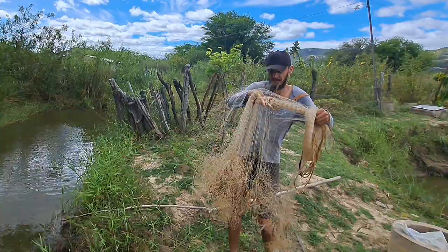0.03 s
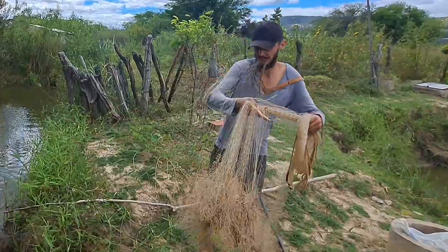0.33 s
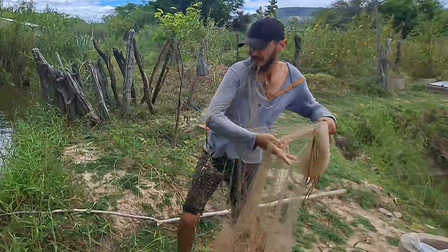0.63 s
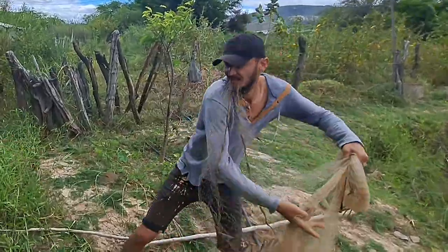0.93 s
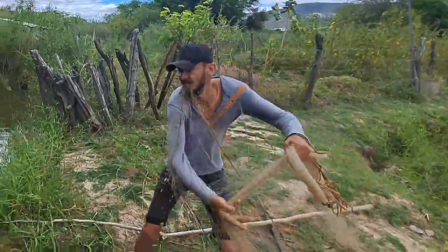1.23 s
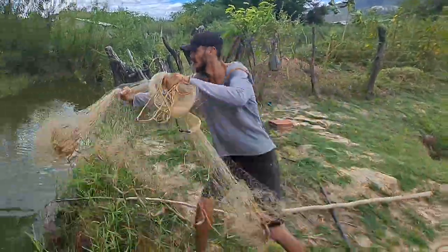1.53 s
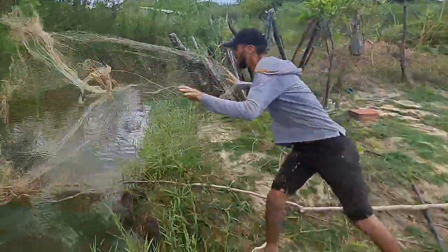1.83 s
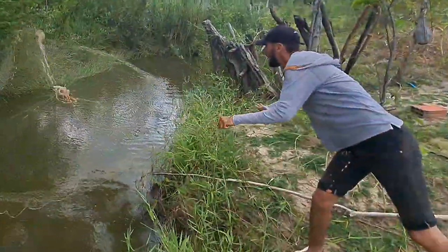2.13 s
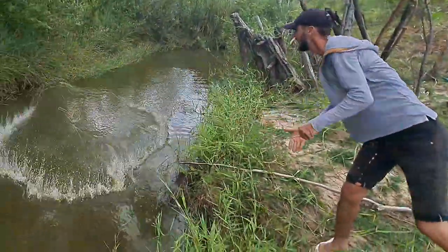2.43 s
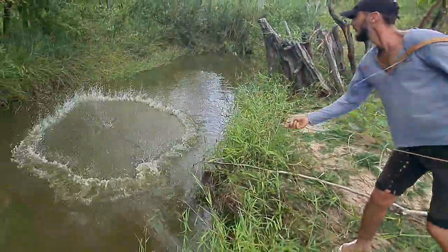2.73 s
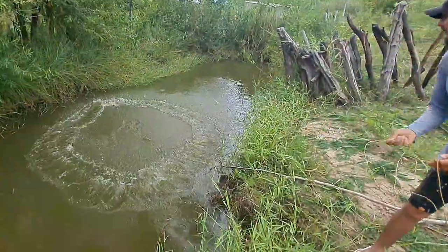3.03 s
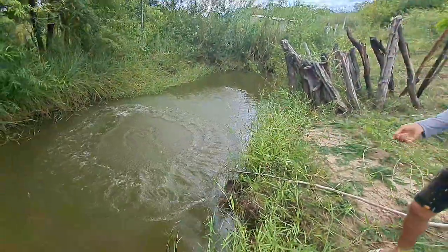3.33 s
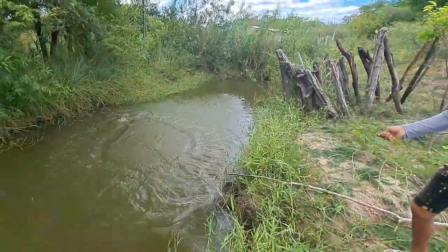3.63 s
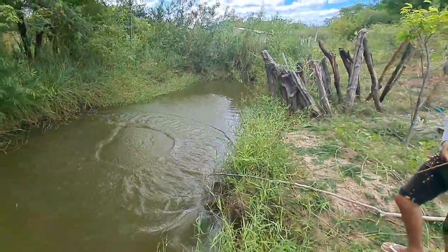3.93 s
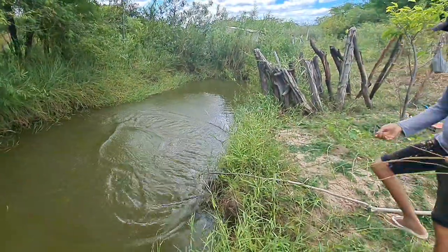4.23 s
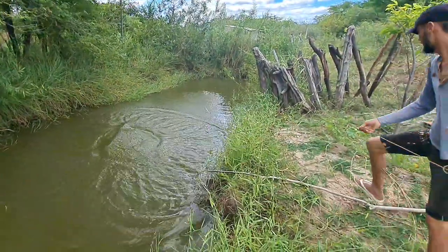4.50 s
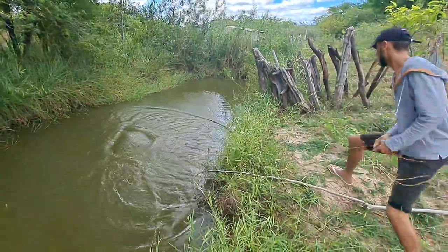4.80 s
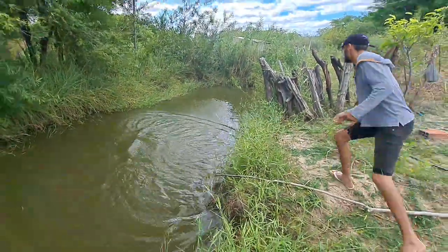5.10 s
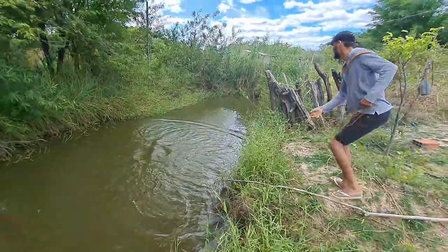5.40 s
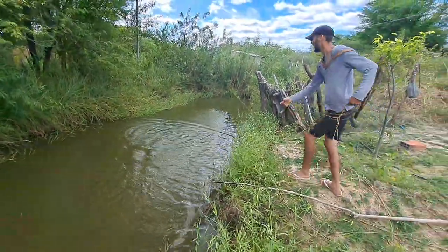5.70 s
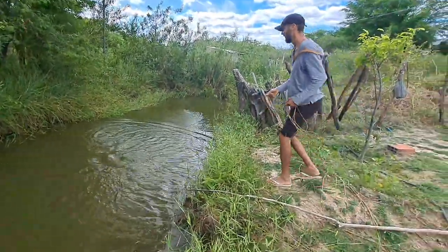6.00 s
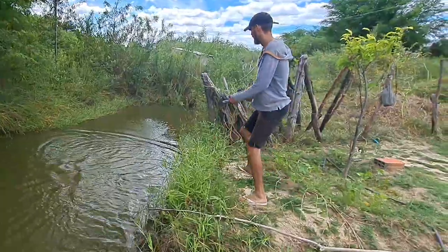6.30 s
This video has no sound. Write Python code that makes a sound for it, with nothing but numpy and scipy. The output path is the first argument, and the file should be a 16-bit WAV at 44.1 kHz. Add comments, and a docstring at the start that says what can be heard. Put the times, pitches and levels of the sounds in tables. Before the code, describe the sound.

Wind buffets the microphone on a pond bank, opening with strong low thumps on the left in the first quarter second, then rumbling in uneven gusts throughout. Leaves hiss softly, a faint far trill fades within the first second, and a distant engine hums low, slowing after 3 seconds. Until about 2 seconds, a cast net rustles faintly, its sinkers clink and a few stalks snap. At about 2.3 seconds the net hits the water: a quick cluster of sharp slaps merges into a loud, broad splash with deep gulping bubbles. Spray patters back around 2.8 to 3.2 seconds, and fizzing foam and drips die away by about 3.5. Small isolated plips follow until the end. From 4 to 6 seconds, quiet footsteps press into dry grass, with a stalk snapping near 5.1 and more wind thumps.

```python
"""A grassy bank by a pond, where a fisherman swings a cast net and throws it onto the water.
The mesh swishes, then the ring of lead sinkers cracks down in arcs; air pockets pinch off and gulp,
spray patters back, foam fizzes and a few last bubbles pop. Feet crunch in the dry grass.
Wind buffets the two microphone ports, leaves hiss, and far off a faint trill fades and an engine slows."""
import sys
import numpy as np
from scipy import signal
from scipy.fft import rfft, irfft, next_fast_len
from scipy.io import wavfile
from scipy.ndimage import uniform_filter1d

SR = 44100
rng = np.random.default_rng(int(sys.argv[2]) if len(sys.argv) > 2 else 0)


def dump(signal):
    """Clip the signal to [-1, 1] and save it as 16-bit WAV at the path in sys.argv[1]."""
    limited = np.clip(np.atleast_2d(signal).T, -1, 1)
    pcm = np.round(limited * 32767).astype(np.int16)
    wavfile.write(sys.argv[1], SR, pcm)


N = 280035
TIME = np.arange(N) / SR
FREQS = np.maximum(np.fft.rfftfreq(2 * N, 1 / SR), 1)

# arcs of the weighted rim land in turn: (time [s], crack level [dB], crack decay [s], churn level [dB])
LANDINGS = [(2.28, -40, 0.0065, -47), (2.342, -56, .006, -40), (2.364, -28, .008, -27),
            (2.371, -17.5, 0.0055, -27), (2.405, -28, 0.009, -34), (2.44, -28, 0.0074, -26),
            (2.513, -22, 0.012, -24), (2.566, -35, .006, -43), (2.643, -35, 0.014, -33)]
# thrown water rains back: (time [s], hold [s], level [dB])
SHOWERS = [(2.762, 0.16, -33.5), (3.002, 0.018, -38.5), (3.103, 0.035, -39), (3.192, 0.013, -68),
           (3.408, 0.035, -59.5)]
# bubbles that stand out: (time [s], level [dB], pitch [Hz], ring time to -60 dB [s])
BUBBLES = [(2.376, -17, 353, 0.045), (2.406, -16, 413, 0.045), (2.422, -12.5, 324, 0.046),
           (2.481, -13, 279, 0.055), (2.51, -15.5, 253, 0.09), (2.54, -18, 328, 0.074),
           (2.571, -20, 265, 0.064), (2.655, -19.5, 398, 0.069), (2.753, -20, 5170, 0.018),
           (2.769, -30.5, 487, 0.12), (2.807, -27, 467, 0.06), (3.375, -45, 1070, 0.021),
           (3.376, -42, 4400, 0.017), (3.421, -38, 1600, 0.018), (3.978, -49, 1638, 0.029),
           (3.983, -48, 2443, 0.017), (4.213, -32.5, 1880, 0.04), (4.446, -45, 2900, 0.021),
           (4.453, -44.5, 1150, 0.079), (4.458, -43.5, 3050, .025), (4.565, -49, 2320, 0.02),
           (4.992, -42, 664, 0.038), (5.298, -47, 2110, .025), (5.858, -49, 3160, .025),
           (6.105, -49.5, 950, 0.055)]
# soft swells: (time [s], level [dB], half length [s])
FIZZ = [(2.287, -48, 0.006), (2.48, -44, 0.14), (2.85, -48.5, 0.17), (3.15, -55.5, 0.32)]  # mist off the mesh, then foam
RUSTLES = [(0.176, -59.5, 0.039), (1.096, -62.5, 0.023), (1.57, -54.5, 0.018), (1.62, -60.5, 0.026),
           (1.95, -61, 0.25), (2.196, -81, 0.1), (3.78, -62, 0.033), (4.105, -59, 0.022),
           (4.289, -56, 0.018), (5.68, -61.5, 0.081)]  # mesh and grass brush past
STEPS = [(4.03, -60, 0.011), (4.755, -59.5, 0.013), (4.80, -56, 0.014), (4.835, -51.5, 0.013),
         (4.875, -60, 0.0039), (5.14, -62, 0.021), (5.3, -61, 0.0093), (5.81, -57, 0.0065)]  # feet press into dry grass
# sharp hits: (time [s], level [dB])
STALK_SNAPS = [(1.099, -55), (1.122, -52), (1.174, -41), (4.028, -46), (5.104, -35.5)]
SINKER_CLINKS = [(0.147, -42), (0.720, -56), (1.864, -43.5), (1.948, -50), (2.042, -45.5), (4.76, -62),
                 (4.835, -60), (5.104, -50)]

# the breeze that never stops: (time [s], left level [dB], right level [dB])
BREEZE = [(0.07, -67, -39), (1.0, -49, -51), (1.65, -68, -42), (2.6, -38, -41.5), (3.6, -47.5, -66),
          (4.05, -51, -56), (4.35, -63, -56), (5.0, -47.5, -72), (6.35, -49, -57)]
# gusts on the ports: (time [s], hold [s], left level [dB], right level [dB])
GUSTS = [(0.075, 0.14, -25, -46), (0.306, 0.068, -52, -38), (0.403, 0.05, -36.5, -39),
         (0.58, 0.22, -40.5, -39.5), (0.829, 0.056, -39, -41.5), (1.218, 0.3, -43.5, -49),
         (1.69, 0.12, -66, -54), (1.833, 0.36, -39.5, -38), (2.111, 0.12, -60, -35),
         (2.166, 0.08, -34.5, -39.5), (2.332, 0.14, -31.5, -31.5), (2.859, 0.32, -37.5, -41.5),
         (3.206, 0.09, -48, -64), (3.395, 0.12, -40, -48), (3.823, 0.32, -55.5, -54.5),
         (4.485, 0.17, -46.5, -48.5), (4.716, 0.089, -39.5, -38.5), (5.029, 0.024, -39, -66),
         (5.107, 0.14, -35.5, -65), (5.256, 0.13, -35, -37.5), (5.429, 0.176, -39.5, -38.5),
         (5.664, 0.083, -54, -70), (5.777, 0.028, -42, -42), (6.026, 0.11, -43, -46)]
# lone eddies: (time [s], left level [dB], right level [dB], pitch [Hz], half length [s])
EDDIES = [(0.079, -21, -38, 70, 0.0088), (0.115, -14, -50, 325, 0.0041), (0.153, -14.5, -50, 500, 0.001),
          (0.158, -6.5, -44, 195, 0.0034), (0.193, -19.5, -50, 375, 0.0043), (0.215, -10, -48, 290, 0.002),
          (0.85, -31, -31, 138, 0.003), (1.422, -24.5, -23, 71, 0.004), (2.038, -21.5, -27.5, 171, 0.0052),
          (2.05, -19, -14, 55.5, 0.013), (4.792, -29, -31.5, 74.4, 0.0098), (5.329, -34, -25, 136.5, 0.013),
          (5.359, -25.5, -29, 224, 0.0022), (5.533, -25, -43, 110, 0.0061), (5.607, -36, -30, 167, 0.0024),
          (5.789, -25.5, -35, 60, 0.0051), (6.076, -32, -40, 90, 0.006)]
# far engine: (time [s], firing rate [Hz], level [dB], second harmonic against first [dB])
ENGINE = [(0.07, 55.5, -44, -32), (0.8, 55.14, -59.5, -6), (1.3, 55.74, -39.5, -17.5),
          (1.65, 55.46, -57, -5), (2.5, 55.98, -56, -10), (3.0, 55.9, -45, -9.5), (3.5, 52.33, -64.5, -1),
          (4.0, 47.54, -52.5, -9.5), (4.55, 45.1, -62, 7.5), (5.0, 42.9, -83, 10), (6.35, 42.6, -73, -6)]
# fader rides for the leaves and the far trill: (time [s], level [dB])
LEAF_LEVEL = [(0.07, -62), (0.9, -64.5), (1.4, -62), (1.8, -59), (3.6, -60.5), (4.6, -60.5), (5.5, -60),
              (6.35, -62.5)]
TRILL_LEVEL = [(0.07, -58.5), (0.3, -61.5), (0.65, -63.5), (0.95, -72), (1.4, -72)]

# tone colour of each layer: (frequency [Hz], relative level [dB])
SPRAY_EQ = [(300, -26), (600, -5.5), (800, -4.5), (1100, -1), (1650, 4), (2050, -4.5), (2550, -2.5),
            (3350, -8), (4100, -9.5), (5400, -10), (6500, -24.5), (8700, -35), (12000, -17.5), (15800, -36)]
POCKET_EQ = [(100, -22), (180, -10.5), (250, -6), (380, 0.5), (520, -4.5), (700, -4.5), (1100, -34)]
DRIP_EQ = [(450, -9.5), (800, -6.5), (1100, 2.5), (1650, -1.5), (2050, -6), (2550, -3), (3500, -12.5),
           (5400, -14), (6500, -20)]
FIZZ_EQ = [(1900, -11), (2600, -3.5), (3300, -7), (4300, -7.5), (5400, -1.5), (6400, -10.5), (8700, -17),
           (12000, -8.5), (15800, -18)]
RUSTLE_EQ = [(300, -16), (1000, -16), (2300, 3), (3500, 0), (5200, 4), (6800, -5.5), (8700, -13),
             (12000, -0.5), (15800, -20.5)]
STEP_EQ = [(400, -3), (1000, 1.5), (2100, 4), (3500, -6), (5200, -0.5), (8500, -19), (12000, -9),
           (15800, -29)]
SNAP_EQ = [(200, -1), (500, 16), (1400, 10.5), (2800, -1), (5200, -2), (8500, -12), (12000, -34),
           (15800, -20)]
CLINK_EQ = [(2500, -8), (5500, -1), (8500, -12), (12000, -0.5), (15800, -9)]
WIND_EQ = [(25, -6.5), (55, 2.5), (110, -3), (200, -11), (400, -19), (800, -35), (1600, -54)]
LEAF_EQ = [(410, -9), (700, -1), (934, 1.5), (1380, -4.5), (2000, -8.5), (2960, -4), (3240, -5.5),
           (4670, -4.5), (5330, -1), (8310, -17), (10700, -9), (12500, -7), (16000, -18)]
TRILL_EQ = [(1300, -29), (1850, -6), (2200, -3.5), (2550, -8), (2950, -26)]
AIR_EQ = [(30, 0.5), (100, -1), (220, -5.5), (380, -0.5), (600, -9.5), (900, -18.5), (1500, -14)]

# pond sound at the ports: (frequency [Hz], left phase lead [rad])
PORT_PHASE = [(100, 0), (450, -0.56), (720, 2.2), (1000, 0.18), (1550, 1.58), (1950, 3), (2760, 8),
              (3400, 8.5), (3900, 10.5), (4500, 15.5), (5400, 22.5), (7000, 30), (16000, 59)]
# shading by the housing: (frequency [Hz], left level over right [dB])
PORT_BALANCE = [(300, 0), (580, -4), (850, 5.5), (1600, 0.7), (2050, 5.5), (2500, -1.5), (4200, -2),
                (6000, 1), (12000, 2)]
# focus of the splash: (frequency [Hz], power common to both ports [0..1])
COMMON_SHARE = [(100, 0.65), (300, 1), (750, 0.88), (1200, 0.79), (2600, 0.61), (3400, 0.3), (4500, 0.45),
                (7000, 0.2), (15000, .05)]
# stereo width of the surroundings: (frequency [Hz], left-right correlation [-1..1])
CORRELATION = [(50, .5), (380, 0.67), (700, 0.45), (1300, -0.37), (2400, -0.063), (4400, -0.0082)]


def slaps(level_db=-2.5):
    """Several sinkers land at once in a short, dense crack."""
    envelope = sum(from_db(db + level_db) * hit(s, decay_s) for s, db, decay_s, _ in LANDINGS)
    cracks = across_pond(lambda: grains(per_s=3700, spread_db=-4.0))
    return envelope * coloured(cracks, SPRAY_EQ)


def spray(bubble_db=-7.0):
    """Sinkers and falling drops crack on the surface and leave small ringing bubbles."""
    def drops():
        ringing = bubble_cloud(low_hz=601, high_hz=9260, cycles=27, spread_db=4, rise=0.076, count=4000)
        return grains(per_s=4500, spread_db=3.5) + from_db(bubble_db) * ringing
    water = evened(coloured(across_pond(drops), SPRAY_EQ), window_s=0.027)
    landing_power = churn(delay_s=0, attack_s=0.0064, fall_db_per_s=80) ** 2
    shower_power = sum((from_db(db) * swell(s, hold_s, attack_s=0.022, fall_db_per_s=121)) ** 2
                       for s, hold_s, db in SHOWERS)
    return water * np.sqrt(landing_power + shower_power)


def air_pockets(level_db=-4.5):
    """Cavities behind the sinkers pinch off just after each landing and gulp: the body of the splash."""
    gulps = across_pond(
        lambda: bubble_cloud(low_hz=192.8, high_hz=828, cycles=20.6, spread_db=3.5, rise=0.11, count=700))
    gulps = evened(coloured(gulps, POCKET_EQ), window_s=0.021)
    return gulps * from_db(level_db) * churn(delay_s=0.0018, attack_s=0.011, fall_db_per_s=44.5)


def churn(delay_s, attack_s, fall_db_per_s):
    """Envelope of the stirred water: the powers of all landings add up."""
    power = sum((from_db(db) * swell(s + delay_s, 0, attack_s, fall_db_per_s)) ** 2
                for s, _, _, db in LANDINGS)
    return np.sqrt(power)


def single_bubbles():
    """Big gulps within the splash, then lone plips as the net sinks."""
    out = np.zeros(N)
    for s, db, hz, t60 in BUBBLES:
        add(out, s, from_db(db) * bubble(hz, t60, rise=0.072))
    return at_ports(out)


def drips(level_db=-41):
    """Larger stray drops plink as the surface settles."""
    plinks = across_pond(
        lambda: bubble_cloud(low_hz=480.6, high_hz=5625, cycles=77, spread_db=0.5, rise=0.064, count=700))
    envelope = swell(s=2.602, hold_s=0.34, attack_s=0.17, fall_db_per_s=57.5)
    return coloured(plinks, DRIP_EQ) * from_db(level_db) * envelope


def fizz():
    """Mist and bursting foam prickle on the surface."""
    prickle = across_pond(lambda: grains(per_s=3500, spread_db=4.0))
    return strokes(FIZZ) * coloured(prickle, FIZZ_EQ)


def bubble_cloud(low_hz, high_hz, cycles, spread_db, rise, count, start_s=2.2, span_s=1.5):
    """Bubbles of all sizes, born at random in the churned water, each ringing for about `cycles`."""
    out = np.zeros(N)
    for when, pitch, strength, ring, sign in rng.random((count, 5)):
        hz = low_hz * (high_hz / low_hz) ** pitch
        db = spread_db * min(-np.log(1 - strength), 3)
        gain = from_db(db) * hz / low_hz * np.sign(sign - .5)
        t60 = cycles * (.5 + ring) / hz
        add(out, start_s + span_s * when, gain * bubble(hz, t60, rise))
    return rms_one(out)


def bubble(hz, t60, rise):
    """A damped sine whose pitch climbs as the bubble nears the surface."""
    t = np.arange(int(t60 * SR)) / SR
    tone = np.sin(2 * np.pi * hz * t * (1 + rise * t / t60))
    attack = 1 - np.exp(-2 * hz * t)
    return tone * from_db(-60 * t / t60) * attack


def handling():
    """The fisherman's foley: mesh swishes, feet crunch the grass, stalks snap and sinkers click."""
    mesh = crackle(RUSTLES, RUSTLE_EQ, per_s=1200, spread_db=4.0)
    grass = crackle(STEPS, STEP_EQ, per_s=1000, spread_db=1.5)
    stalks = clicks(STALK_SNAPS, SNAP_EQ, decay_s=0.003)
    sinkers = clicks(SINKER_CLINKS, CLINK_EQ, decay_s=0.0027)
    return mesh + grass + stalks + sinkers


def crackle(rows, eq, per_s, spread_db):
    """Fibres slip and snap under each stroke."""
    fibres = np.array([grains(per_s, spread_db) for port in range(2)])
    return strokes(rows) * coloured(fibres, eq)


def clicks(events, eq, decay_s):
    """Sharp contacts that die within a few milliseconds."""
    return sum(from_db(db) * hit(s, decay_s) for s, db in events) * all_around(eq)


def wind(level_db=-2.5, brightening=0.21, calm_db=-39.0, flutter_db=4.0, lumps_db=5.5):
    """Turbulence rumbles at each port on its own; stronger gusts shed smaller eddies and sound brighter."""
    force_db = wind_force()
    ride_db = force_db + level_db + lumps_db * np.tanh(drift(28))
    turbulence = coloured(rng.standard_normal((2, N)), WIND_EQ)
    centres_hz = 40 * 2 ** np.arange(6)
    out = 0
    for octave, hz in enumerate(centres_hz):
        band = filtered(turbulence, np.interp(np.log(FREQS), np.log(centres_hz), centres_hz == hz))
        band = np.std(band) * evened(band, window_s=.05)
        tilt_db = brightening * max(octave - 1, 0) * (force_db - calm_db)
        out = out + band * from_db(ride_db + tilt_db + flutter_db * drift(32))
    return out


def wind_force(puffs_db=3.5):
    """Push on each port in dB: gusts on top of a breeze that comes in uneven puffs."""
    power = np.array([from_db(db + puffs_db * np.tanh(drift(6.3))) ** 2 for db in in_time(BREEZE)])
    for s, hold_s, left_db, right_db in GUSTS:
        gust = swell(s, hold_s, attack_s=0.02, fall_db_per_s=1300)
        power = power + (from_db([[left_db], [right_db]]) * gust) ** 2
    return 10 * np.log10(power)


def eddies():
    """Lone eddies thump the ports, each pushing and pulling once or twice."""
    out = np.zeros((2, N))
    for s, left_db, right_db, hz, half_s in EDDIES:
        near = np.abs(TIME - s) < 4 * half_s
        t = TIME[near] - s
        thump = np.exp(-(t / half_s) ** 2) * np.sin(2 * np.pi * hz * t)
        out[:, near] += from_db([[left_db], [right_db]]) * thump
    return out


def engine(waver_db=5.0):
    """A far engine hums and slows; only its two lowest harmonics carry this far."""
    hz, db, second_db = in_time(ENGINE)
    phase = 2 * np.pi * np.cumsum(hz) / SR
    hum = np.sqrt(2) * (np.sin(phase) + from_db(second_db) * np.sin(2 * phase))
    return from_db(db - waver_db * drift(1.8)) * hum


def surroundings(air_db=-59.0, leaf_pan_db=1.1):
    """The ambience bed: breeze hissing in the leaves, a narrow far trill and the dull wash of open air."""
    pan = from_db([[-leaf_pan_db], [leaf_pan_db]])
    leaves = from_db(in_time(LEAF_LEVEL)[0]) * all_around(LEAF_EQ) * pan
    trill = from_db(in_time(TRILL_LEVEL)[0]) * all_around(TRILL_EQ)
    return leaves + trill + from_db(air_db) * all_around(AIR_EQ)


def across_pond(draw):
    """A wide ring of water: both ports share its lows, but each picks up fine detail of its own."""
    share = np.clip(at_hz(COMMON_SHARE), 0, 1)
    common = at_ports(draw(), share)
    return common + filtered(np.array([draw(), draw()]), np.sqrt(1 - share))


def at_ports(x, share=0.91):
    """Pond sound reaches the left port first, and the housing shades each port differently."""
    lead, shade_db = at_hz(PORT_PHASE), at_hz(PORT_BALANCE)
    return np.array([filtered(x, np.sqrt(share) * from_db(side * shade_db) * np.exp(side * 1j * lead))
                     for side in (.5, -.5)])


def all_around(eq):
    """Smooth noise from every side; rms 1."""
    alike = np.clip(at_hz(CORRELATION), -1, 1)
    mid = filtered(rng.standard_normal(N), np.sqrt(1 + alike))
    side = filtered(rng.standard_normal(N), np.sqrt(1 - alike))
    return coloured(np.array([mid + side, mid - side]), eq)


def grains(per_s, spread_db):
    """Random clicks of uneven size; rms 1."""
    sizes = from_db(spread_db * np.minimum(rng.exponential(1, N), 4)) * rng.choice([-1, 1], N)
    return rms_one(sizes * (rng.random(N) < per_s / SR))


def drift(hz, hop=40, settle=2000):
    """A slow random wobble; rms about 1."""
    pole = np.exp(-2 * np.pi * hz * hop / SR)
    noise = rng.standard_normal(N // hop + settle + 2)
    slow = signal.lfilter([1], [1, -2 * pole, pole * pole], noise)[settle:]
    return np.interp(np.arange(N) / hop, np.arange(len(slow)), rms_one(slow))


def hit(s, decay_s):
    """An instant attack at time s with an exponential tail."""
    return (TIME >= s) * np.exp(-np.abs(TIME - s) / decay_s)


def swell(s, hold_s, attack_s, fall_db_per_s):
    """An envelope that rises to 1 at time s, holds and dies away."""
    rise = np.clip(1 + (TIME - s) / attack_s, 0, 1)
    return rise * from_db(-np.clip(fall_db_per_s * (TIME - s - hold_s), 0, 200))


def strokes(rows):
    """An envelope that swells and fades evenly about each cue."""
    return sum(from_db(db) * np.exp(-.5 * ((TIME - s) / half_s) ** 2) for s, db, half_s in rows)


def evened(x, window_s):
    """A leveller: keep the grain of x but hold its slower level at 1."""
    power = np.mean(np.atleast_2d(x) ** 2, axis=0)
    size = int(window_s * SR)
    slow_power = np.abs(uniform_filter1d(uniform_filter1d(power, size), size))
    return x / np.sqrt(slow_power + 1e-6 * power.mean())


def coloured(x, eq):
    """Shape x with an EQ curve that rolls off steeply past its ends; rms 1."""
    low_cut = 1 + (.7 * eq[0][0] / FREQS) ** 6
    high_cut = 1 + (FREQS / (1.4 * eq[-1][0])) ** 6
    return rms_one(filtered(x, from_db(at_hz(eq)) / np.sqrt(low_cut * high_cut)))


def filtered(x, response):
    """Apply a frequency response given at FREQS."""
    size = next_fast_len(N + SR // 10)
    gain = np.interp(np.fft.rfftfreq(size, 1 / SR), FREQS, response)
    return irfft(rfft(x, size) * gain, size)[..., :N]


def at_hz(points):
    """Read a curve at FREQS on a log-frequency axis."""
    hz, value = np.transpose(points)
    return np.interp(np.log(FREQS), np.log(hz), value)


def in_time(rows):
    """Each column of an automation curve at every sample."""
    s, *columns = np.transpose(rows)
    return [np.interp(TIME, s, column) for column in columns]


def add(track, s, sound):
    """Mix a short sound in at time s."""
    i = int(s * SR)
    track[i:i + len(sound)] += sound[:max(N - i, 0)]


def from_db(db):
    """Decibels to gain."""
    return 10 ** (np.asarray(db) / 20)


def rms_one(x):
    """Scale to unit rms."""
    return x / np.sqrt(np.mean(x ** 2) + 1e-20)


def scene():
    """The throw, the splash and the bank around them."""
    splash = spray() + slaps() + air_pockets() + drips() + single_bubbles() + fizz()
    return splash + handling() + wind() + eddies() + engine() + surroundings()


def record(dry):
    """The sound opens after an instant of silence; the top is cut steeply."""
    start_s, cutoff_hz = 0.069, 15900
    fade_in = np.clip((TIME - start_s) / .003, 0, 1)
    return filtered(dry * fade_in, np.clip((cutoff_hz - FREQS) / 150, 0, 1))


dry = scene()
out = record(dry)
dump(out)
```